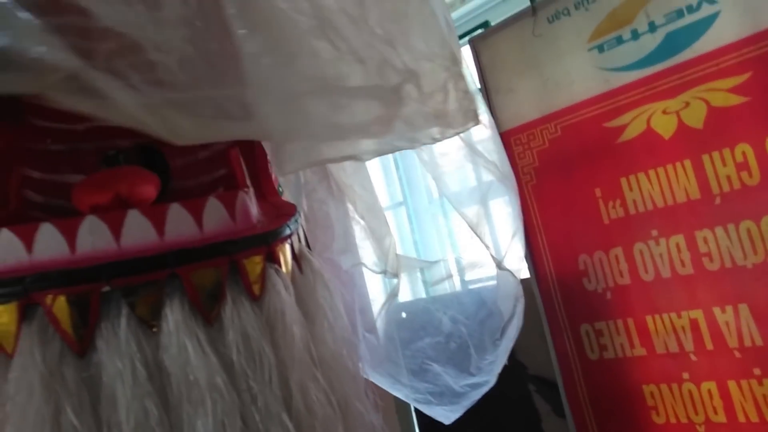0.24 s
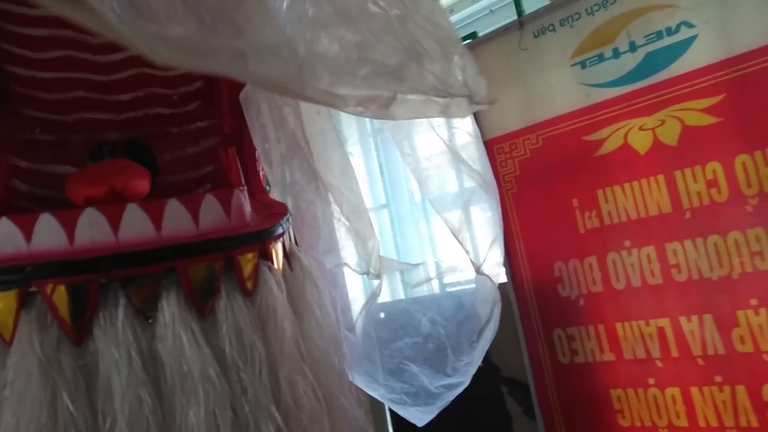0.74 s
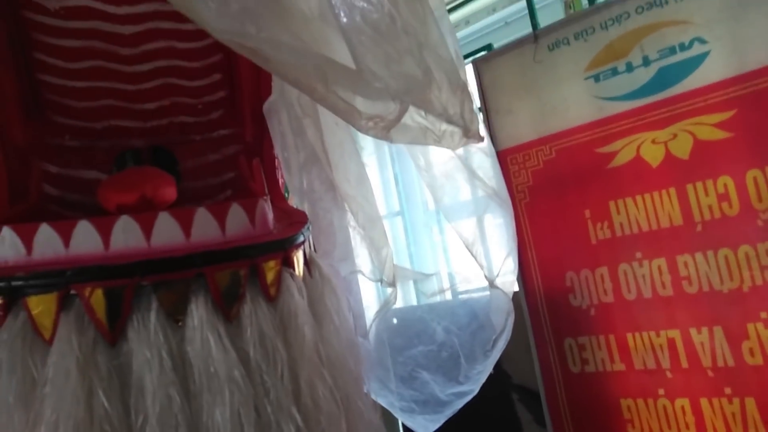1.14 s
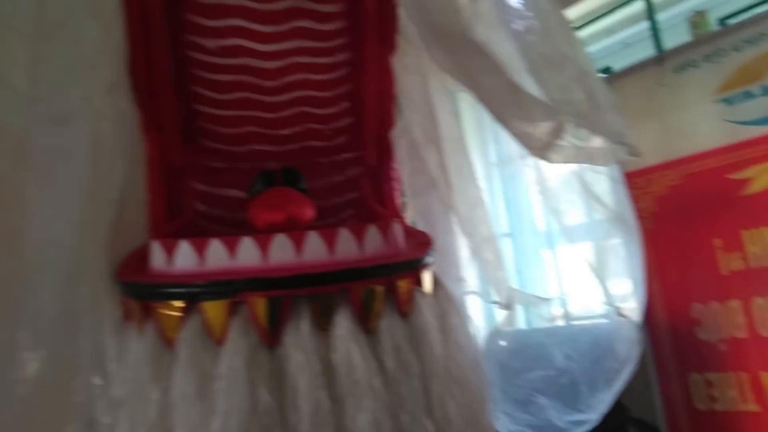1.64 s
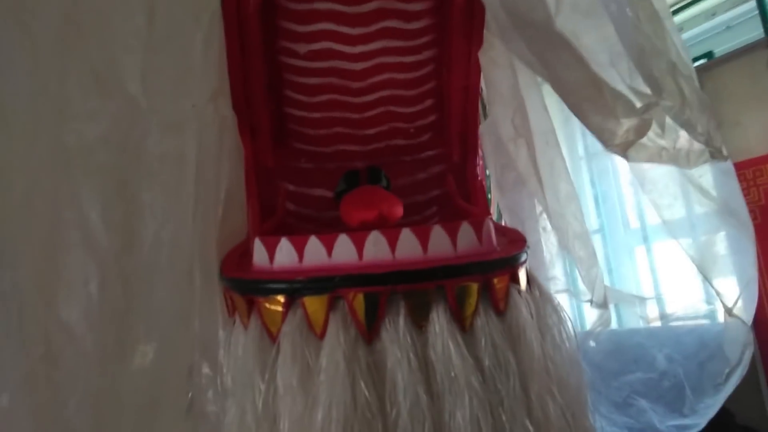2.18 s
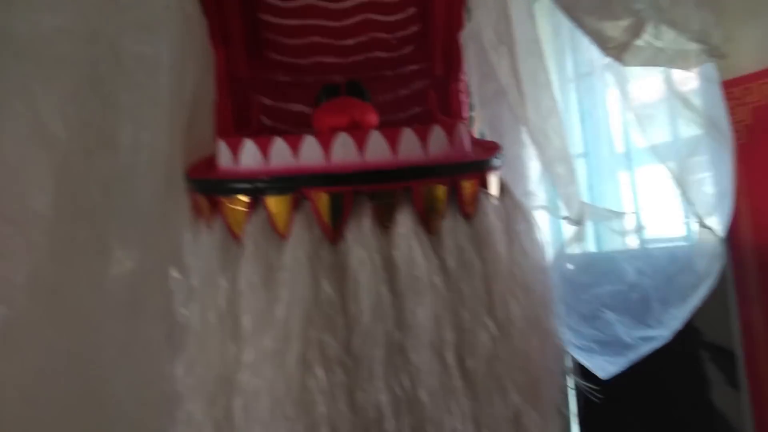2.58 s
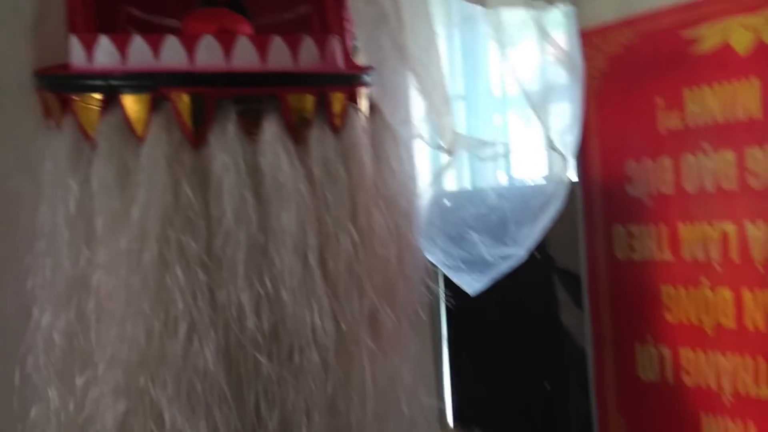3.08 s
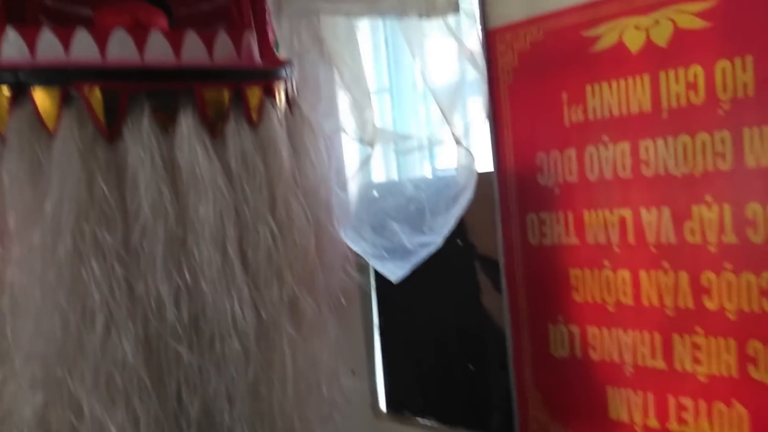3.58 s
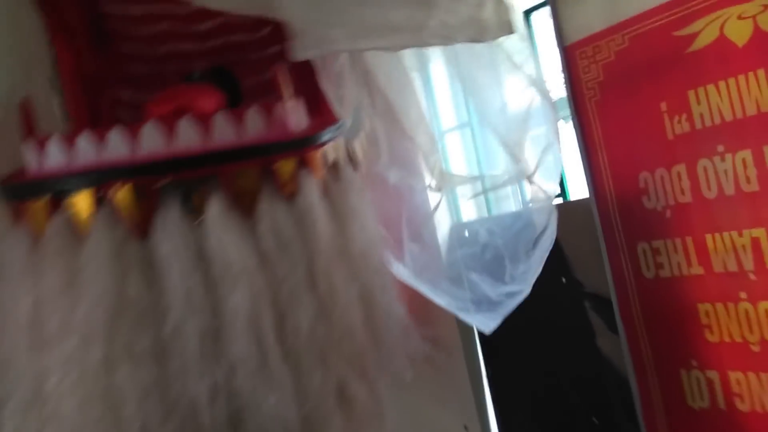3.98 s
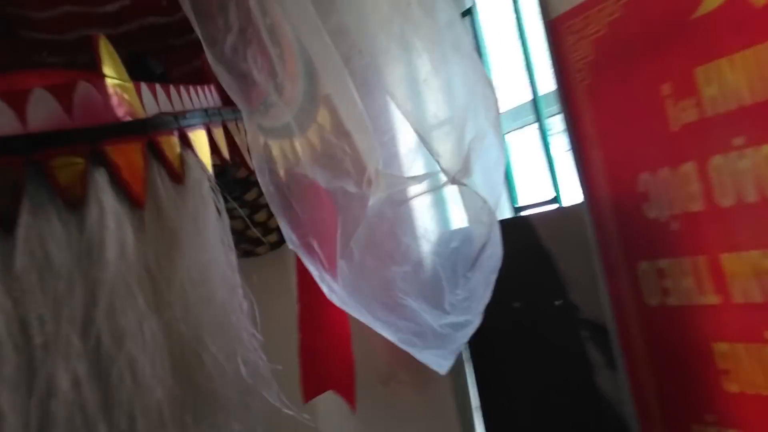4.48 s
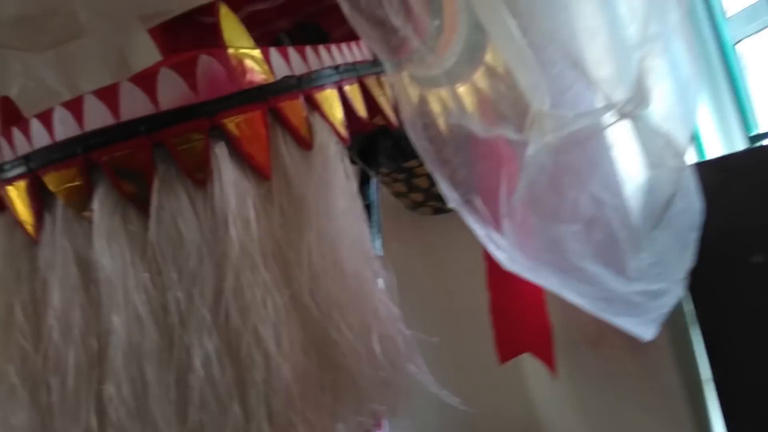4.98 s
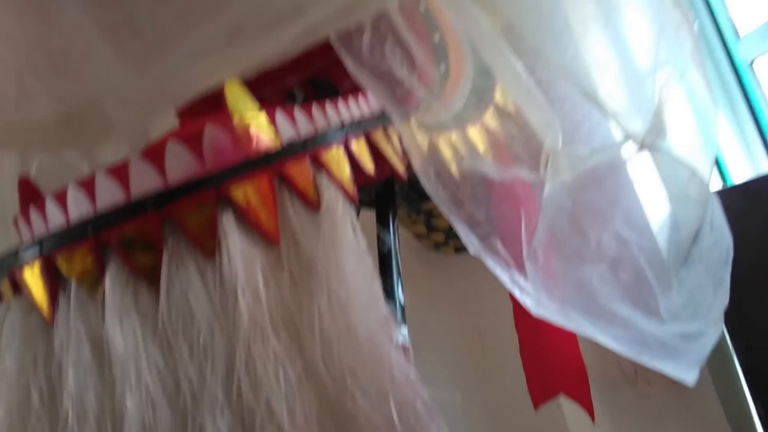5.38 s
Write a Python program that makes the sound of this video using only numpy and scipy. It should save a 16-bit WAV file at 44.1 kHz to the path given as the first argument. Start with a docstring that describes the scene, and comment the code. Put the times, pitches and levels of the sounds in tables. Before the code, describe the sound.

A small motor hisses and whines in two long swells while plastic sheeting crinkles and snaps close by, with dull bumps indoors.

```python
"""Air hisses in two long swells with a thin, gliding whine: indoors, a small fast motor (a blower,
perhaps) runs, coasts, spins up with a soft spurt of hiss and coasts again. The faster its shaft turns,
the louder the air rushes and the higher the whine sings. Close by, plastic sheeting crinkles and snaps
as its creases buckle. Soft rubbing, a low rumble, dull bumps and one hard knock sound in the room."""
import sys
import numpy as np
from scipy import signal
from scipy.fft import rfft, irfft, next_fast_len
from scipy.io import wavfile
from scipy.ndimage import uniform_filter1d, map_coordinates

SR = 44100
rng = np.random.default_rng(int(sys.argv[2]) if len(sys.argv) > 2 else 0)


def unload_wav(signal):
    """Save mono or channel-first audio to the path in sys.argv[1] as 16-bit WAV at rate SR, clipped to [-1, 1]."""
    wavfile.write(
        sys.argv[1],
        SR,
        np.round(np.clip(np.atleast_2d(signal).T, -1, 1) * 32767).astype(np.int16),
    )


N = 248283

HISS_DB, HISS_RISE_DB = -36, 15.5  # base level of the hiss, and its rise each time the airflow doubles


def amp(db):
    """Turn decibels into a number to multiply a sound by."""
    return 10 ** (np.asarray(db) / 20)


def unit(x):
    """Scale a signal to an average strength (rms) of 1."""
    return x / np.sqrt(np.mean(np.abs(x) ** 2) + 1e-20)


def along(points, hz):
    """Read between (frequency, value) points, spacing the octaves evenly."""
    freqs, values = np.transpose(points)
    return np.interp(np.log(hz + 1), np.log(freqs), values)


def curve(points):
    """Join (time, value) points with straight lines, giving one value per sample."""
    times, values = np.transpose(points)
    return np.interp(np.arange(N) / SR, times, values)


def wobble(rate):
    """A smooth curve through random values, `rate` of them each second."""
    return map_coordinates(rng.standard_normal(int(N * rate / SR) + 4), [np.arange(N) * rate / SR])


def filtered(x, response):
    """Multiply each frequency in a sound by response(hz)."""
    size = next_fast_len(len(x) + SR // 4)
    return irfft(rfft(x, size) * response(np.fft.rfftfreq(size, 1 / SR)), size)[:len(x)]


def coloured(x, spectrum):
    """Shape a sound with (frequency, level) points, then scale it to strength 1."""
    return unit(filtered(x, lambda hz: amp(along(spectrum, hz))))


def resonance(hz, centre_hz, q):
    """A filter that favours one pitch; a higher q makes it narrower."""
    return 1j * hz * centre_hz / q / (centre_hz ** 2 - hz ** 2 + 1j * hz * centre_hz / q)


def add(track, start, sound):
    """Mix a sound into the track, beginning at `start` seconds."""
    part = track[max(round(start * SR), 0):][:len(sound)]
    part += sound[:len(part)]


def shaft_speed():
    """The motor's turns per second: driven through each run, then slowed by friction and air drag."""
    # the motor under power, one list per run: (time [s], speed [turns/s])
    runs = [
        [(0, 319), (.28, 320), (.4, 306), (.48, 301), (.69, 304)],
        [(2.47, 97), (2.56, 172), (2.75, 227), (3, 286), (3.15, 312), (3.4, 336), (3.6, 347), (3.94, 353)],
    ]
    friction, drag_speed = 72.9, 255  # bearing loss [turns/s per s]; speed where drag equals it [turns/s]
    t, speed = np.arange(N) / SR, np.zeros(N)
    for run in runs:
        start, (end, last_speed) = run[0][0], run[-1]
        slowing = friction / drag_speed * np.maximum(t - end, 0)
        coast = drag_speed * np.tan(np.arctan(last_speed / drag_speed) - slowing)
        speed = np.where(t < start, speed, np.where(t < end, curve(run), coast))
    return speed


def flow_level(base_db, rise_db, lag_s=0):
    """Level in dB of air that follows the shaft speed; each doubling of the flow adds rise_db."""
    # slow drift, mostly from the microphone moving about: (time [s], level change [dB])
    drift = [(0, 2), (.2, 0.6), (1, 0.5), (1.25, 0), (2.1, -1.5), (2.3, 1), (2.43, -2.5), (2.58, -0.5),
             (2.78, 1.4), (3.3, -0.87), (3.9, -1.06), (4.25, 0.5), (4.8, -0.5), (5.63, 2.5)]
    working_speed, stall_speed = 320, 89  # turns/s; below the stall speed the flow collapses
    t = np.arange(N) / SR
    speed = np.interp(t - lag_s, t, shaft_speed())
    flow = speed / (1 + (stall_speed / speed) ** 8)
    return base_db + rise_db * np.log2(flow / working_speed) + curve(drift)


def turbulence(patchy_db):
    """Swirling air: noise whose strength drifts in patches of time and pitch."""
    noise = signal.stft(rng.standard_normal(N), nperseg=1024)[2]
    patches = uniform_filter1d(rng.standard_normal(noise.shape), size=3, axis=0)  # smooth over pitch
    patches = uniform_filter1d(patches, size=14, axis=1)  # smooth over time
    return unit(signal.istft(noise * amp(patchy_db * unit(patches)), nperseg=1024)[1][:N])


def crinkle(rate, spread_db):
    """The sheeting gives tiny clicks of uneven size, about `rate` each second."""
    size = amp(spread_db * np.minimum(rng.standard_exponential(N), 4))
    return unit((rng.random(N) < rate / SR) * size * rng.standard_normal(N))


def near_walls(x, strength, count=10):
    """Weak, quick echoes from nearby walls lift some pitches and lower others."""
    echoes = np.zeros(SR // 40)
    echoes[0] = 1  # the direct sound
    echoes[rng.integers(SR // 500, len(echoes), count)] = strength * rng.choice([-1, 1], count)
    return signal.fftconvolve(x, echoes / np.linalg.norm(echoes))[:N]


def airflow():
    """Air rushes through the motor housing and over the sheeting, which adds fine crinkles."""
    # pitches at which the housing rings: (frequency [Hz], width [Hz], lift [dB])
    housing = [(2940, 220, 1.5), (4310, 72, 0.5), (4940, 150, 2), (6090, 230, 2.5)]
    # tone of the air's bright hiss, lower body and very high fizz: (frequency [Hz], level [dB])
    hiss_tone = [(900, -33), (1700, -5), (2400, 1), (3400, 1), (5000, 2.5), (6500, 0), (8000, -3.5),
                 (10000, -10), (13000, -58)]
    body_tone = [(350, -79), (600, -9), (900, 1), (1300, 4), (1900, 2.5), (2600, -6.5), (4500, -26)]
    fizz_tone = [(6000, -32), (9000, 0), (11500, 4), (14000, -1.5), (15800, -4.5)]
    # the fizz grows and fades: (time [s], level change [dB])
    fizz_drift = [(0, -2), (1.8, -1.5), (2.15, 1), (2.4, -5), (2.75, 5.5), (3.1, 0), (3.9, -0.5),
                  (4.6, 0.5), (4.92, 7.5), (5.63, 5)]
    hiss_db = flow_level(HISS_DB, HISS_RISE_DB, lag_s=0.018)
    body_db = flow_level(base_db=-48.5, rise_db=8.5, lag_s=0.004)
    fizz_db = flow_level(base_db=-46.5, rise_db=20.5, lag_s=0.021) + curve(fizz_drift)
    flow = turbulence(patchy_db=1.6) + amp(-5.5) * crinkle(rate=1900, spread_db=0.9)
    lift = lambda hz: amp(sum(db / (1 + (2 * (hz - centre) / width) ** 2) for centre, width, db in housing))
    hiss = amp(hiss_db) * coloured(filtered(flow, lift), hiss_tone)
    body = amp(body_db + 0.36 * wobble(30)) * coloured(turbulence(patchy_db=1), body_tone)
    fizz = amp(fizz_db) * coloured(rng.standard_normal(N), fizz_tone)
    air = near_walls(hiss + body + fizz, strength=0.1)
    return air * amp(0.41 * wobble(35))  # the level flickers slightly


def whine_note(turns, multiple):
    """One note at a multiple of the shaft speed; swirling air and echoes blur it, high notes more."""
    blur_hz = 55 + 4.5 * multiple
    flutter = unit(wobble(blur_hz) + 1j * wobble(blur_hz))
    return unit(np.real(flutter * np.exp(2j * np.pi * multiple * turns)))


def whine():
    """The blades and the motor's spinning contacts (commutator) sing, drifting in and out of the hiss."""
    # notes that always sound: (multiple of the shaft speed, level against the hiss [dB])
    notes = [(4, -24.5), (8, -20.5), (12, -30), (40, -24)]
    # notes that stand out for a while:
    # (start [s], end [s], multiple of the shaft speed, level against the hiss [dB])
    flares = [(-.1, .42, 40, -24), (.23, .55, 12, -8), (0.268, .6, 8, -11), (2.66, 3.5, 8, -11),
              (2.908, 3.73, 4, -15), (3.12, 4.1, 40, -19), (3.6, 3.78, 12, -7), (4.68, 5.455, 48, -11),
              (5, 5.48, 72, -14)]
    fade_s = 0.089
    t, turns = np.arange(N) / SR, np.cumsum(shaft_speed()) / SR
    tone = sum(amp(db + 1.5 * wobble(4.48)) * whine_note(turns, round(multiple)) for multiple, db in notes)
    for start, end, multiple, db in flares:
        swell = np.clip(np.minimum(t - start, end - t) / fade_s, 0, 1)
        tone += amp(db) * swell * whine_note(turns, round(multiple))
    return amp(flow_level(HISS_DB, HISS_RISE_DB)) * tone


def rubbing():
    """Soft, uneven rubbing, stroke by stroke, over a faint low draught that follows the motor."""
    # rubbing strokes: (start [s], length before fading [s], level [dB])
    strokes = [(-.05, 0.42, -56.5), (0.453, 0.63, -59), (1.5, 0.22, -63), (2.92, 0.51, -61),
               (3.337, 0.23, -51.5), (3.997, 0.42, -54.5), (4.592, 0.13, -48.5), (4.83, .05, -53),
               (5.143, 0.09, -56.5)]
    # dull tone of both rubbing and draught: (frequency [Hz], level [dB])
    rub_tone = [(90, -33), (160, -19.5), (230, -12), (340, 3.5), (470, 0), (600, 1.5), (900, -1.5),
                (1600, -20.5)]
    rise_s, fade_s = 0.066, 0.54  # time to build up; time to fall by 60 dB
    t, stroke_level = np.arange(N) / SR, np.zeros(N)
    for start, length, db in strokes:
        rise = np.clip((t - start) / rise_s, 0, 1)
        stroke_level += rise * amp(db - 60 * np.maximum(t - start - length, 0) / fade_s)
    draught_level = amp(flow_level(base_db=-64.5, rise_db=29))
    level = np.hypot(stroke_level, draught_level) * amp(1.77 * wobble(25))
    return level * coloured(turbulence(patchy_db=3.5), rub_tone)


def rumble():
    """A faint, deep noise swells and sinks."""
    # strength of the rumble: (time [s], level [dB])
    levels = [(0, -72), (.65, -86), (1.15, -82.5), (2.1, -93), (2.22, -77), (2.55, -71), (3.2, -79),
              (3.45, -96), (4.08, -78), (4.32, -61.5), (4.55, -70), (5.05, -59), (5.45, -84)]
    # its deep tone: (frequency [Hz], level [dB])
    rumble_tone = [(20, -24), (50, -16), (70, 4.5), (85, -5), (104, 0.5), (130, -2.5), (300, -34)]
    return amp(curve(levels)) * coloured(rng.standard_normal(N), rumble_tone)


def bumps():
    """Soft, dull contacts: each has its own pitch and stirs the same hollow boom."""
    # one row per bump: (time [s], relative level [dB], pitch [Hz], time to fall by 60 dB [s])
    hits = [(0.017, -40, 401, 0.53), (1.119, -61, 108, 0.25), (1.417, -41, 396, 0.38),
            (1.923, -54, 654, 0.15), (2.188, -41, 550, 0.18), (2.461, -60, 103, 0.18),
            (2.497, -57, 85, 0.12), (2.692, -76, 105, 0.18), (2.989, -49, 153, 0.21),
            (3.075, -37.5, 270, 0.37), (3.199, -44, 275, 0.13), (3.389, -39.5, 580, 0.35),
            (3.79, -41.5, 335, 0.58), (4.131, -43, 370, 0.29), (4.184, -36, 440, 0.41),
            (4.976, -37, 151, 0.17), (5.039, -42, 135, 0.17), (5.096, -41.5, 136, 0.12)]
    track, t = np.zeros(N), np.arange(SR // 2) / SR
    rise = 1 - np.exp(-t / 0.0015)
    boom = lambda hz: amp(-8) * resonance(hz, 263, q=3.6) ** 2
    for start, db, centre_hz, fade_s in hits:
        tone = lambda hz: resonance(hz, centre_hz, q=0.62) ** 2 + boom(hz)
        thud = unit(filtered(rng.standard_normal(len(t)), tone))
        add(track, start, amp(db - 9) * thud * rise * amp(-60 * t / fade_s))
    return track


def snaps_and_spurt():
    """Sharp bursts with a low flap and a rustle: plastic creases buckling, and one spurt of hiss."""
    # plastic snaps, except at 2.524 s: a soft, sharp onset of hiss as the motor starts up again
    # (time [s], relative level [dB], pitch [Hz], flap level against the crack [dB])
    onsets = [(0.0521, -16.5, 6470, -15), (0.255, -25, 3880, -23), (0.2955, -21.5, 3730, -16),
              (0.5736, -20, 5200, -29), (0.662, -22, 5370, -13), (0.7, -27, 5800, -26),
              (0.7634, -15, 5520, -24), (0.9433, -23, 3300, -11), (1.0566, -30, 2880, -4.5),
              (1.426, -35, 2910, -14), (1.4297, -23.5, 4700, -11), (1.452, -31, 3070, -8),
              (1.4606, -29.5, 3140, -9), (1.8506, -22, 5530, -12.5), (1.9247, -29, 4420, -10),
              (2.048, -43, 2470, -24), (2.1689, -49.5, 4000, 6), (2.1909, -28, 4720, -8.5),
              (2.212, -36, 2360, -15), (2.311, -42, 3000, -13), (2.524, -43, 2400, -3),
              (2.9852, -28, 2380, -24), (4.6091, -25.5, 5600, -8), (4.9187, -29, 7450, -14),
              (5.46, -32, 6120, -32), (5.5794, -34.5, 3020, -14)]
    track, t = np.zeros(N), np.arange(SR // 4) / SR
    burst = lambda fade_s: rng.standard_normal(len(t)) * amp(-60 * t / fade_s)
    for start, db, centre_hz, flap_db in onsets:
        jolt = (t == 0) + 0.12 * burst(fade_s=0.014)
        tone = lambda hz: resonance(hz, centre_hz, q=2.1) * resonance(hz, centre_hz, q=0.5)
        damping = lambda hz: 1 / np.sqrt(1 + (hz / (1.22 * centre_hz)) ** 4)
        # high pitches arrive first, as they do when a bend travels through a sheet
        travel = lambda hz: np.exp(-2j * np.pi * 0.001183 * np.sqrt(centre_hz * hz))
        crack = filtered(jolt, lambda hz: tone(hz) * damping(hz) * travel(hz))
        flap = filtered(burst(fade_s=0.02), lambda hz: resonance(hz, 1060, q=0.9))
        grains = rng.standard_normal(len(t)) ** 3  # cubing makes the noise crackly
        settle = filtered(grains, lambda hz: resonance(hz, 2700, q=0.63))
        rustle = amp(-24.5 - 60 * t / 0.13) * unit(settle)
        tick = filtered(burst(fade_s=0.0053), lambda hz: resonance(hz, 2.6 * centre_hz, q=1.5))
        crack, tick, flap = (part / abs(part).max() for part in (crack, tick, flap))
        add(track, start, amp(db + 3.5) * (crack + amp(-17.5) * tick + amp(flap_db) * flap + rustle))
    return track


def knock():
    """A hard blow across the room: a few ringing notes inside a dense, fading clatter."""
    # the blow: (time [s], relative level [dB])
    blows = [(4.742, -26.5)]
    # notes the struck object rings with: (frequency [Hz], level [dB], time to fall by 60 dB [s])
    notes = [(149.4, -7, 0.34), (325, -13, .22), (611, 5, 0.6), (970, -11, .3), (1114, 14, 0.21),
             (1280, 7, 0.29), (1795, 6.5, 0.33), (1990, 4, 0.39), (2134, 3, .3), (2280, 13, 0.26)]
    # tone of the clatter: (frequency [Hz], level [dB])
    clatter_tone = [(80, -18), (160, -4.5), (600, -5.5), (1200, 0.5), (2400, -1.5), (2800, -7), (6000, -7),
                    (12000, -31)]
    track, t = np.zeros(N), np.arange(SR // 2) / SR
    ring = sum(amp(db - 60 * t / fade_s) * np.sin(2 * np.pi * (hz * t + rng.random()))
               for hz, db, fade_s in notes)
    clatter_fade = amp(-60 * t / 0.3) + amp(-10.5 - 60 * t / 0.5)
    clatter = coloured(rng.standard_normal(len(t)), clatter_tone) * clatter_fade
    rise = 1 - np.exp(-t / 0.0008)
    for start, db in blows:
        add(track, start, amp(db) * (amp(-4) * ring / abs(ring).max() + amp(-9) * clatter) * rise)
    return track


def room(x):
    """The walls answer with a wash of echoes, in which the highest pitches die first."""
    # how long the room rings: (frequency [Hz], time to fall by 60 dB [s])
    fade_times = [(150, 0.64), (1000, 0.48), (5000, 0.56), (14000, 0.22)]
    hz, t, noise = signal.stft(rng.standard_normal(SR // 2), SR, nperseg=256)
    tail = signal.istft(noise * amp(-60 * t / along(fade_times, hz)[:, None]), SR, nperseg=256)[1]
    delayed_tail = np.pad(tail, (SR // 250, 0)) / np.linalg.norm(tail)
    return signal.fftconvolve(x, delayed_tail)[:N]


def scene():
    """All the sounds reach one microphone, which feeds both channels."""
    bursts, contacts = snaps_and_spurt(), bumps() + knock()
    direct = airflow() + whine() + rubbing() + rumble() + bursts + contacts
    mono = direct + room(amp(-6.5) * bursts + amp(-13.5) * contacts)
    return np.array([mono, mono])


def record(dry):
    """The recorder keeps nothing above its highest frequency."""
    top_hz = 15850
    return np.array([filtered(channel, lambda hz: hz < top_hz) for channel in dry])


dry = scene()
out = record(dry)
unload_wav(out)
```